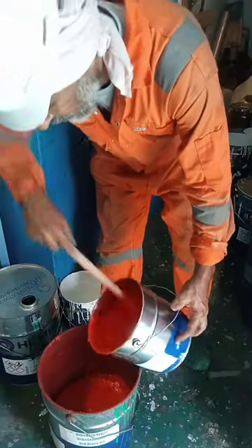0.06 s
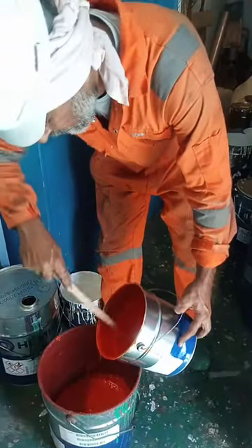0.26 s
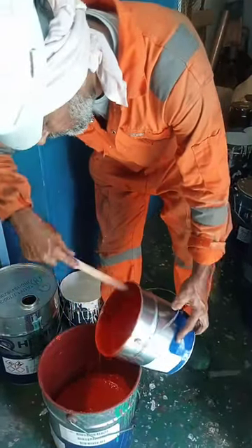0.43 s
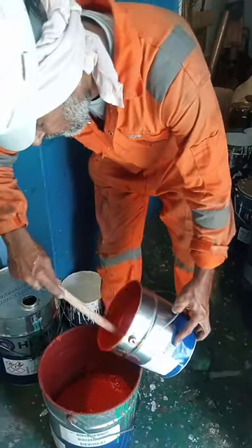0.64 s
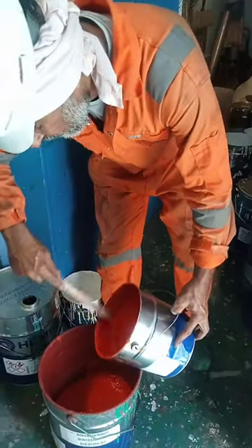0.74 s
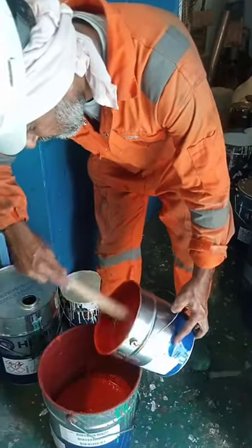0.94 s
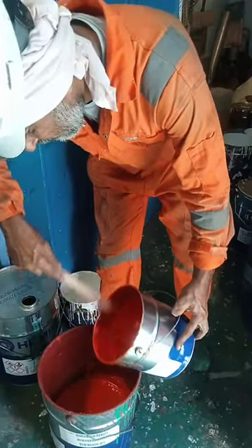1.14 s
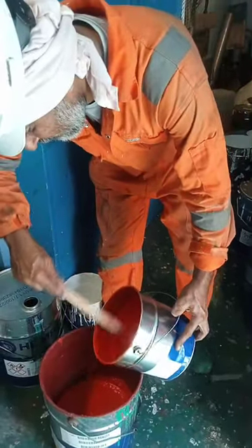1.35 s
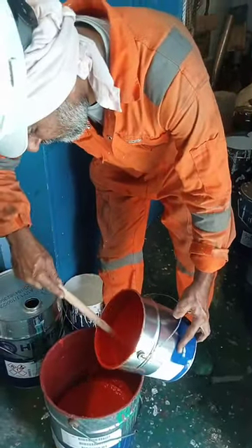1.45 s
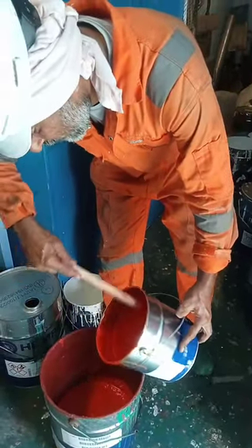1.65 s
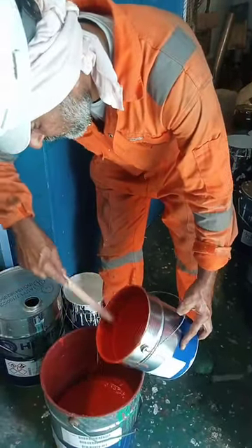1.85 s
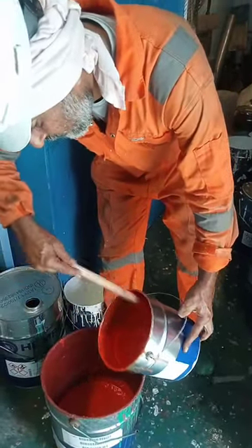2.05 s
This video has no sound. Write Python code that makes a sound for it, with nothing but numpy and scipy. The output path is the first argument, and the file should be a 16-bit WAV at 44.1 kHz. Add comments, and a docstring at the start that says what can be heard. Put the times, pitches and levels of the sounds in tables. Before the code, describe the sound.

A wooden stick scrapes thick paint from a metal can, about three strokes a second, with hollow thumps, a bright rim ping and a soft wet hiss. It sounds close, in a small hard room with humming ventilation.

```python
"""Scraping paint out of a can

A wooden stick scrapes thick paint out of a tilted metal can, about three strokes a second.
It catches and slips along the wall, thumps the paint-covered bottom and pings the rim.
The can jolts in the hand, and the wet paint hisses softly as the stick slides through it.
A small, hard room echoes briefly, over the steady hum and hiss of ventilation."""
import sys
import numpy as np
from scipy import signal
from scipy.fft import rfft, irfft
from scipy.io import wavfile

SR = 44100
rng = np.random.default_rng(int(sys.argv[2]) if len(sys.argv) > 2 else 0)


def write(x):
    x = np.atleast_2d(x).T
    wavfile.write(sys.argv[1], SR, np.round(np.clip(x, -1, 1) * 32767).astype(np.int16))


N = 92610

# The stick hits the can. Each row: start in seconds, drag time in seconds, note of that spot in Hz, # then
# levels in dB for five bands: low wall, middle wall, clack, metal ring, sizzle. # Most rows strike the wall;
# the row at 1.094 s, with its high note, is a light tick on the rim.
STICK_KNOCKS = [ (.238, 0.019, 1085, -30.5, -31.5, -33.5, -33, -50.5),
                (0.264, 0.029, 1092, -37.5, -34.5, -36, -47, -78),
                (.303, 0.038, 1120, -39, -35.5, -40, -41.5, -84),
                (.377, 0.023, 1132, -32.5, -31.5, -35, -35, -54.5),
                (.447, .020, 1098, -27, -32.5, -44, -37, -56),
                (.499, 0.011, 612, -24, -30.5, -33.5, -30, -48.5),
                (.638, 0.014, 4700, -57, -48, -65, -44, -48),
                (0.644, 0.012, 1306, -42.5, -39, -40.5, -23.5, -41.5),
                (0.7861, 0.0083, 1100, -28, -26, -22.5, -23.5, -37),
                (.822, 0.029, 1094, -36, -35, -45, -38, -57), (0.873, 0.016, 510, -32, -42, -55, -54, -74),
                (.927, 0.027, 1161, -39, -36, -42.5, -46.5, -78),
                (1.007, 0.028, 490, -29.5, -36.5, -45, -38, -55.5),
                (1.094, 0.021, 5940, -39.5, -47.5, -52, -35, -50),
                (1.180, 0.017, 1204, -38.5, -30, -32, -30.5, -51.5),
                (1.242, .024, 1068, -31, -34, -43, -48.5, -66),
                (1.382, 0.041, 586, -36.5, -47, -51.5, -48, -76),
                (1.401, 0.014, 1218, -37, -37, -53, -60, -77),
                (1.483, 0.008, 1190, -43, -35, -50.5, -47, -65),
                (1.537, 0.014, 1183, -34, -28.5, -32, -33.5, -55.5),
                (1.7995, 0.019, 1309, -37, -32.5, -43, -39.5, -52.5)]
# The edges of those five bands in Hz, from low to high.
KNOCK_BANDS_HZ = [440, 900, 1450, 3400, 6200, 15000]
# The bottom flexes. Each row: start in seconds, pitch in Hz, level in dB, push time in seconds.
BOTTOM_THUMPS = [ (0.2395, 392, -3.5, 0.0042), (0.268, 385, -22, 0.002), (0.32, 393, -20.5, 0.022),
                 (0.349, 380, -24, 0.019), (0.383, 393, -30, 0.034), (0.445, 377.2, -9, 0.023),
                 (0.507, 413, -25, 0.019), (0.786, 388, -20, 0.0046), (0.808, 367.5, -22, 0.012),
                 (0.879, 378, -18.5, 0.024), (0.926, 403, -23, 0.0156), (1.002, 387.6, -23.5, 0.031),
                 (1.097, 392, -27, 0.015), (1.171, 401, -34, 0.042), (1.24, 388.8, -11.5, 0.016),
                 (1.272, 400, -17, 0.01), (1.383, 376, -25.5, 0.0039), (1.401, 369.6, -25.5, 0.043),
                 (1.542, 399, -27, .008), (1.558, 383, -19.5, 0.019), (1.808, 392.7, -15.5, 0.0073),
                 (2.035, 377, -28, 0.031)]
# Smaller hits. Each row: start in seconds, level in dB.
RIM_PINGS = [(0.6422, -18), (1.1, -38.5)]
CAN_JOLTS = [(0.242, -37), (0.5, -38.5), (.880, -41), (1.030, -42.5), (1.243, -48), (1.551, -36),
             (1.805, -40)]
# How loud the wet paint hisses. Each row: time in seconds, level in dB.
WIPE_LEVELS = [(0, -55), (.2, -71), (.6, -50), (.86, -53), (1.15, -52.5), (1.30, -56.5), (1.42, -53),
               (1.63, -79), (1.71, -55), (1.78, -57), (1.88, -65), (1.95, -51), (2.02, -46.5),
               (2.10, -47.5)]

# Modes are the tones a part rings with when hit.
# Each row: pitch in Hz, level in dB, seconds to fade by 60 dB (called T60).
WALL_MODES = [(462, -4, 0.12), (556.3, -12, 0.13), (634, -8.5, 0.059), (775.4, -11, 0.094), (940, -22, .14),
              (974, -8.5, 0.11), (1112.4, 4.5, 0.076), (1176.6, 0.5, 0.098), (1219, -2.5, 0.13),
              (1301, -12.5, 0.14), (1527, -19, 0.28), (1842, -11, 0.15), (2137, -11.5, 0.089),
              (4190, -4, 0.12)]
BOTTOM_SIDE_MODES = [(267, -10, .05), (345, 1, 0.054), (448, -13, 0.017)]  # short tones around the bottom's main note
RIM_MODES = [(3617, -13, .09), (4000, -5, .11), (4298, -8, .07), (4574, -2, .05), (4702, 0, .08),
             (4812, -8, .06), (5256, -10, .09), (5900, -14, .08), (7000, -22, .07), (10800, -24, .05)]
BODY_MODES = [(176.4, -10.5, 0.36), (219.3, 10, .1), (300, 18, 0.031)]

# A colour makes a sound dull or bright. Each row: frequency in Hz, boost or cut in dB.
SHEET_COLOUR = [(300, -6.5), (600, -7), (900, -7), (1170, -10.5), (1430, -8), (1600, -1), (2050, -3),
                (2350, -4), (3000, -8.5), (3700, -7), (4650, 5.5), (5400, -2), (6300, -11), (8000, -13.5),
                (10500, -18.5), (15000, -46.5)]  # the thin metal's short shiver
TICK_COLOUR = [(500, -17), (2500, -11), (4700, 0), (6500, -8), (10500, -17), (15000, -27)]  # the first hard touch of wood on metal
PING_COLOUR = [(500, -30), (2500, -19), (3700, 5.5), (5500, 9), (7500, -13), (11000, 2), (13000, -17),
               (16000, -23)]
PAINT_COLOUR = [(300, -11), (600, 7.5), (1200, 1), (3000, -11), (4700, 5), (6500, -9.5), (10500, -13.5),
                (15000, -33)]
ECHO_COLOUR = [(200, -2.5), (400, 4.5), (1000, -1.5), (2500, -6), (4700, -7.5), (10000, -7.5)]
AIR_COLOUR = [(20, -6), (35, -21), (60, 0), (100, 0), (160, -0.5), (260, -4), (450, -2.5), (750, -13.5),
              (1200, -12), (2000, -18.5), (3200, -23), (4700, -15.5), (5500, -19.5), (6500, -35),
              (8000, -36.5), (10500, -37), (12500, -55.5), (16000, -49)]

CHATTER_PER_S, CHATTER_SCATTER_DB, FIRST_CLICK = 1300, 2.5, 1.86
TICK_DB, TICK_T60_S, SHEET_T60_S = 2, 0.0097, 0.068
MODES_DB, NOTE_DB, NOTE_T60_S = -5, -10.5, 0.1
MODE_SCATTER_DB, MODE_DETUNE = 2, 0.0059  # the paint weighs on the metal differently at each hit
BOTTOM_T60_S, BOTTOM_LATE_T60_S = 0.056, 0.26
BOTTOM_LATE_DB, BOTTOM_SIDE_DB = -31, -15.5
RIM_ATTACK_S, RADIATION_HZ = 0.0008, 129  # the small can gives off little sound below this pitch
ROOM_DB, ROOM_T60_S, ROOM_RISE_S, BOTTOM_ROOM_SHARE = -9, 0.2, 0.0061, 0.45
AIR_DB, HUM_HZ, HUM_DB = -42.5, 115.1, -54
RUMBLE_WAVER_DB, RUMBLE_WAVER_HZ, RUMBLE_EDGE_HZ = 3.5, 16.5, 500
TOP_HZ = 15800
RING_S = np.arange(SR // 2) / SR  # time since a hit
ONSET = SR * 3 // 100  # samples in the first 30 ms, where a hit's level is set


def wall_knocks():
    """The stick clicks, then quickly catches and slips, shaking the thin wall and making it ring."""
    out, n = np.zeros(N), len(RING_S)
    bands = [signal.butter(4, edges, "band", fs=SR, output="sos")
             for edges in zip(KNOCK_BANDS_HZ, KNOCK_BANDS_HZ[1:])]
    for at, drag, note_hz, *levels_db in STICK_KNOCKS:
        contact = np.exp(-(RING_S / drag) ** 2)
        slips = rng.random(n) < CHATTER_PER_S / SR
        force = slips * gain(CHATTER_SCATTER_DB * rng.standard_normal(n)) * contact
        force[0] = FIRST_CLICK
        # Every slip adds a little energy, which then dies away.
        energy = np.abs(signal.fftconvolve(force ** 2, fade(SHEET_T60_S) ** 2)[:n])
        sheet = unit(colour(np.sqrt(energy) * rng.standard_normal(n), SHEET_COLOUR), ONSET)
        build_up = np.sqrt(np.cumsum(contact) / contact.sum())
        modes = gain(MODES_DB) * unit(ring(WALL_MODES) * build_up, ONSET)
        note = gain(NOTE_DB) * unit(ring([(note_hz, 0, NOTE_T60_S)]) * build_up, ONSET)
        tick = gain(TICK_DB) * unit(colour(rng.standard_normal(n), TICK_COLOUR)) * fade(TICK_T60_S)
        knock = tick + sheet + modes + note
        for band, db in zip(bands, levels_db):
            add(out, at, gain(db) * unit(signal.sosfilt(band, knock), ONSET))
    return out


def bottom_thumps():
    """The wet bottom's note swells while pushed, dies quickly and leaves a faint ring."""
    out = np.zeros(N)
    decay = fade(BOTTOM_T60_S) + gain(BOTTOM_LATE_DB) * fade(BOTTOM_LATE_T60_S)
    for at, hz, db, push_s in BOTTOM_THUMPS:
        push = np.clip((push_s - RING_S) * SR, 0, 1)
        swell = signal.fftconvolve(push, decay)[:len(decay)]
        note = swell / swell.max() * np.sin(2 * np.pi * hz * RING_S)
        side_tones = gain(BOTTOM_SIDE_DB) * ring(BOTTOM_SIDE_MODES) * np.minimum(RING_S / push_s, 1)
        add(out, at, gain(db) * (note + side_tones))
    return out


def rim_pings():
    """The stiff rim rings brightly when the stick taps it."""
    out = np.zeros(N)
    for at, db in RIM_PINGS:
        ping = colour(ring(RIM_MODES) * rise(RIM_ATTACK_S), PING_COLOUR)
        add(out, at, gain(db) * unit(ping, ONSET))
    return out


def can_jolts():
    """The whole can jolts in the hand with a dull, low knock."""
    out = np.zeros(N)
    soft_start = 1 - fade(0.066)
    for at, db in CAN_JOLTS:
        add(out, at, gain(db) * unit(ring(BODY_MODES) * soft_start, ONSET))
    return signal.sosfilt(signal.butter(4, RADIATION_HZ, "high", fs=SR, output="sos"), out)


def paint_wipe():
    """A smooth hiss swells as the stick slides through wet paint."""
    times, levels_db = np.array(WIPE_LEVELS).T
    swell = gain(np.interp(np.arange(N) / SR, times, levels_db))
    return swell * unit(colour(rng.standard_normal(N), PAINT_COLOUR))


def room_echo(x):
    """Hard walls nearby throw the sound back as a short, blurred echo."""
    tail = colour(rng.standard_normal(len(RING_S)), ECHO_COLOUR) * fade(ROOM_T60_S) * rise(ROOM_RISE_S)
    tail /= np.sqrt(np.sum(tail ** 2))
    return gain(ROOM_DB) * signal.fftconvolve(x, tail)[:N]


def ventilation():
    """Moving air hisses evenly and rumbles unsteadily, while a motor hums and wavers."""
    air = unit(colour(rng.standard_normal(N), AIR_COLOUR))
    rumble = signal.sosfiltfilt(signal.butter(2, RUMBLE_EDGE_HZ, fs=SR, output="sos"), air)
    air += rumble * (gain(RUMBLE_WAVER_DB * drift(RUMBLE_WAVER_HZ)) - 1)
    hum = np.sin(2 * np.pi * HUM_HZ * np.arange(N) / SR + 0.3 * drift(hz=1.9))
    hum *= gain(3.6 * drift(hz=2))
    return gain(AIR_DB) * air + gain(HUM_DB) * unit(hum)


def ring(modes):
    """Add up fading tones, each a little different in level and pitch at every hit."""
    out = np.zeros(len(RING_S))
    for hz, db, t60 in modes:
        level = gain(db + MODE_SCATTER_DB * rng.standard_normal())
        pitch = hz * (1 + MODE_DETUNE * rng.standard_normal())
        out += level * fade(t60) * np.sin(2 * np.pi * (pitch * RING_S + rng.random()))
    return out


def colour(x, points):
    """Boost or cut a sound's frequencies by a colour table."""
    hz, db = np.array(points, float).T
    size = 4096
    freqs = np.maximum(np.fft.rfftfreq(size, 1 / SR), 1)
    curve = gain(np.interp(np.log(freqs), np.log(hz), db))
    # These steps make a filter that rings only after a hit, never before it.
    cepstrum = irfft(np.log(curve))
    cepstrum[1:size // 2] *= 2
    cepstrum[size // 2 + 1:] = 0
    response = irfft(np.exp(rfft(cepstrum)))
    return signal.fftconvolve(x, response)[:len(x)]


def gain(db):
    """Turn decibels into a number to multiply by."""
    return 10 ** (np.asarray(db) / 20)


def unit(x, count=N):
    """Scale a sound so its first count samples have an average (rms) level of 1."""
    return x / np.sqrt(np.mean(x[:count] ** 2) + 1e-18)


def fade(t60):
    """Die away by 60 dB every t60 seconds."""
    return np.exp(-np.log(1000) * RING_S / max(t60, 1e-3))


def rise(seconds):
    """Climb smoothly from 0 to 1."""
    return 1 - np.exp(-(RING_S / seconds) ** 2)


def drift(hz):
    """Wander at random around zero; a higher hz wanders faster."""
    return unit(signal.sosfilt(signal.butter(2, hz, fs=SR, output="sos"), rng.standard_normal(N)))


def add(out, at, x):
    """Mix a sound in at a time in seconds."""
    start = int(at * SR)
    out[start:start + len(x)] += x[:N - start]


def scene():
    """Mix can, room and ventilation into one channel; the bottom gets less echo than the rest."""
    can = wall_knocks() + rim_pings() + can_jolts() + paint_wipe()
    thumps = bottom_thumps()
    echo = room_echo(can + BOTTOM_ROOM_SHARE * thumps)
    return (can + thumps + echo + ventilation())[None]


def record(dry):
    """Cut away the very highest treble."""
    return signal.sosfilt(signal.ellip(8, .2, 70, TOP_HZ, fs=SR, output="sos"), dry)


dry = scene()
out = record(dry)
write(out)
```